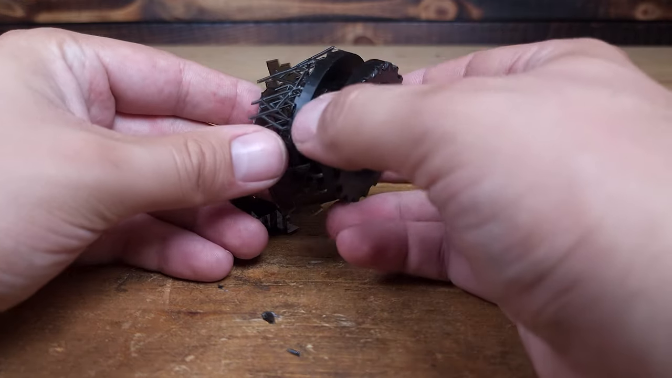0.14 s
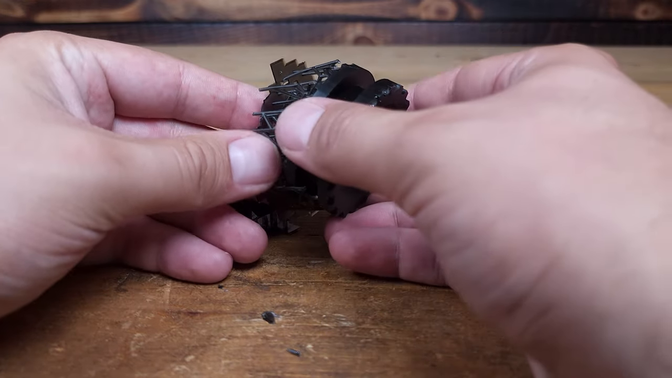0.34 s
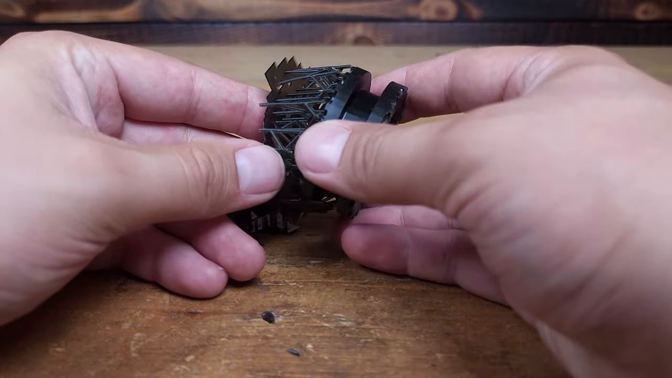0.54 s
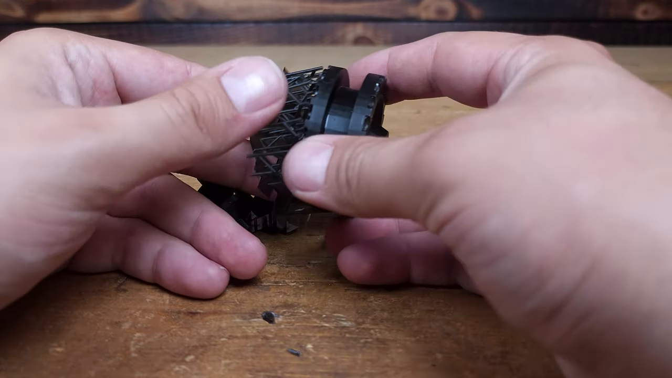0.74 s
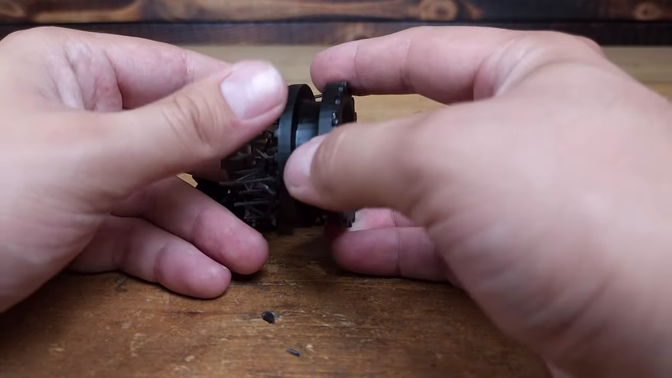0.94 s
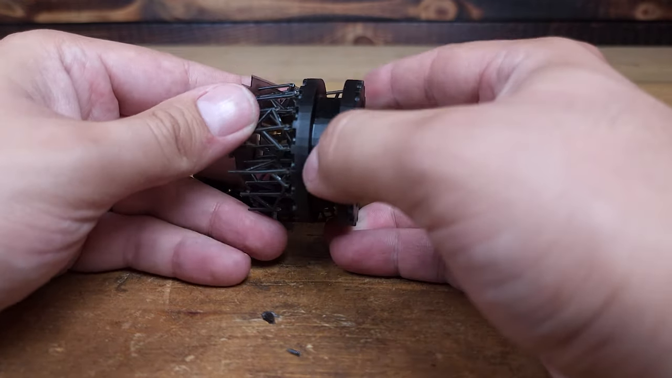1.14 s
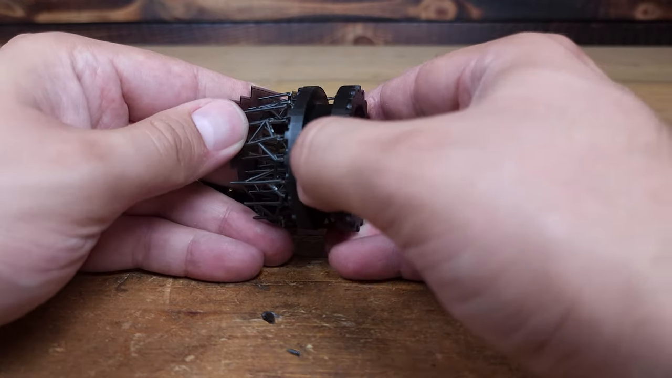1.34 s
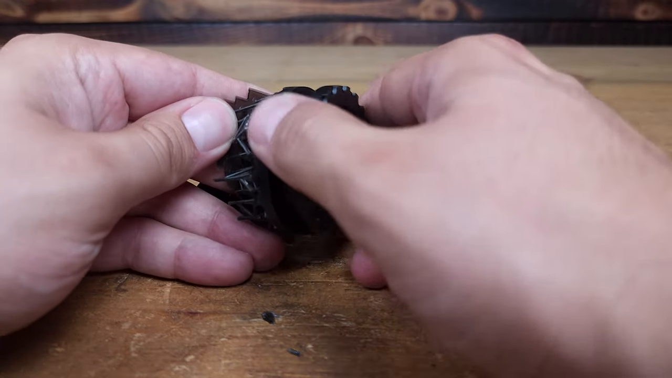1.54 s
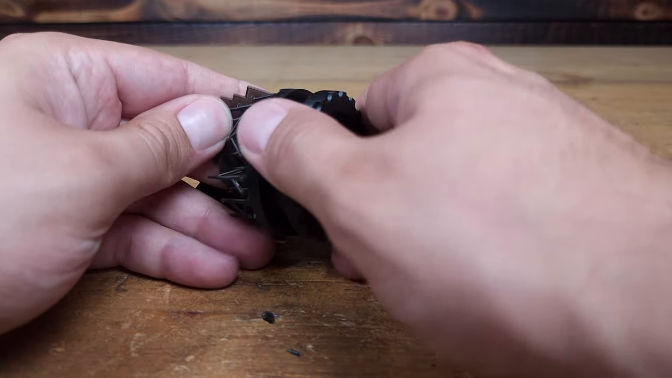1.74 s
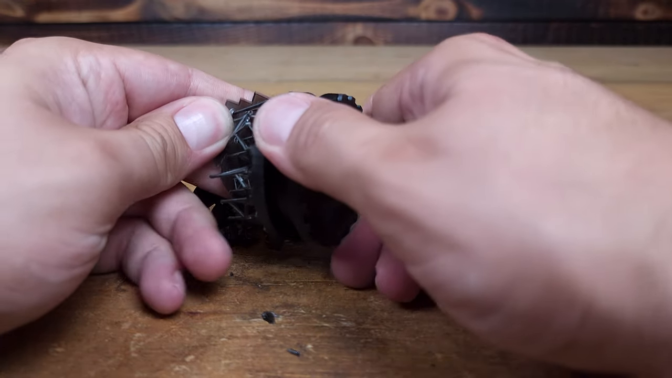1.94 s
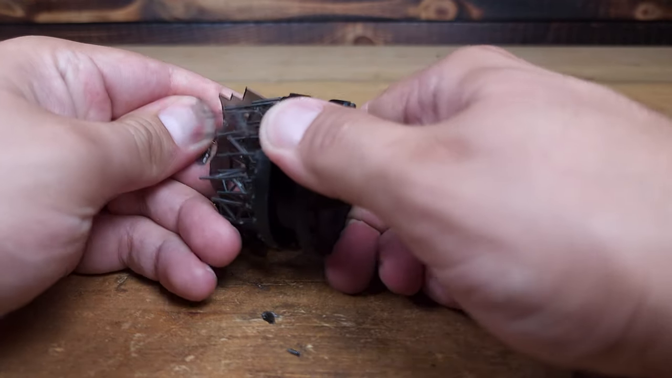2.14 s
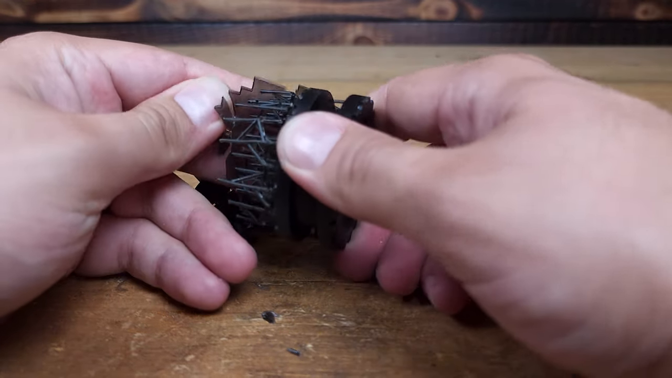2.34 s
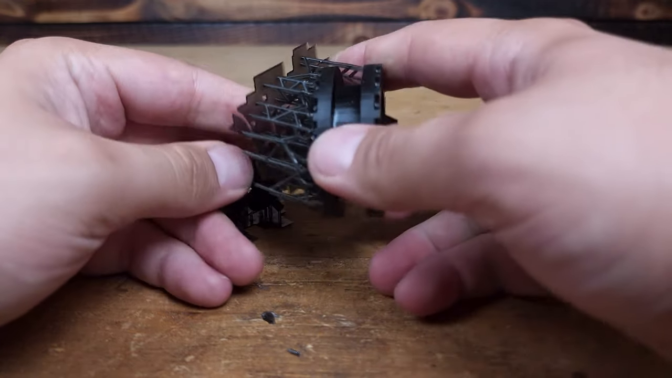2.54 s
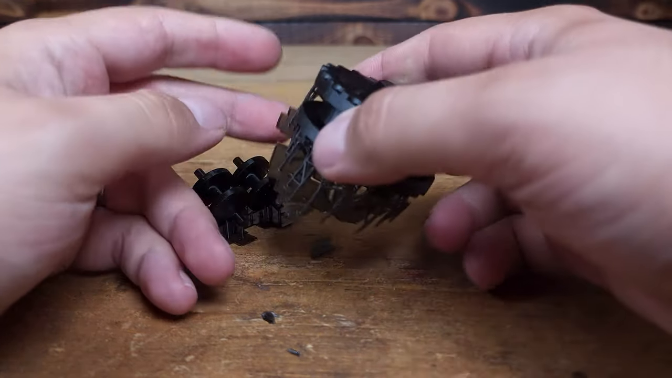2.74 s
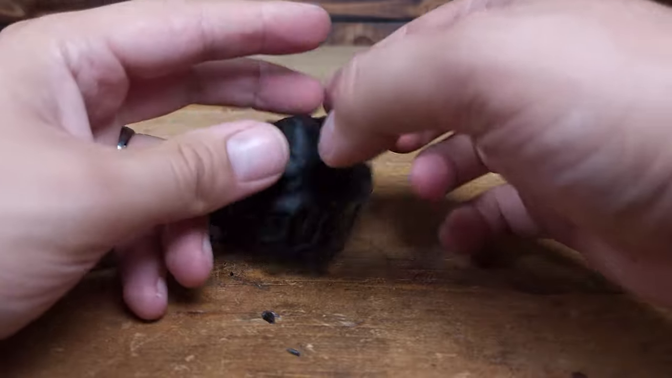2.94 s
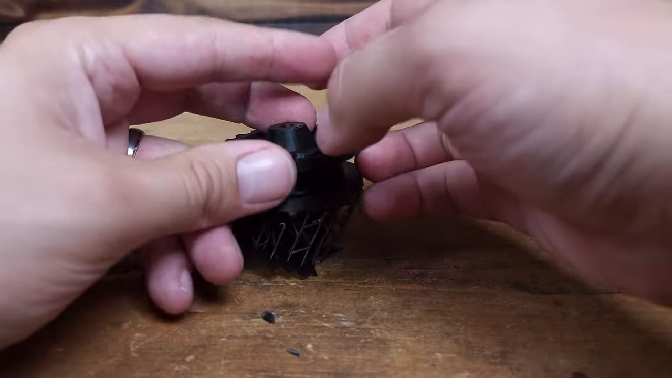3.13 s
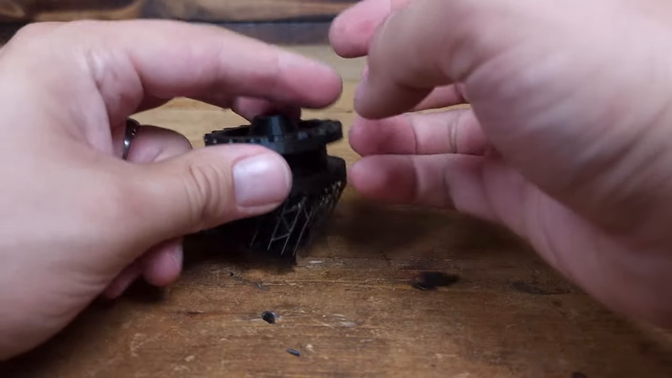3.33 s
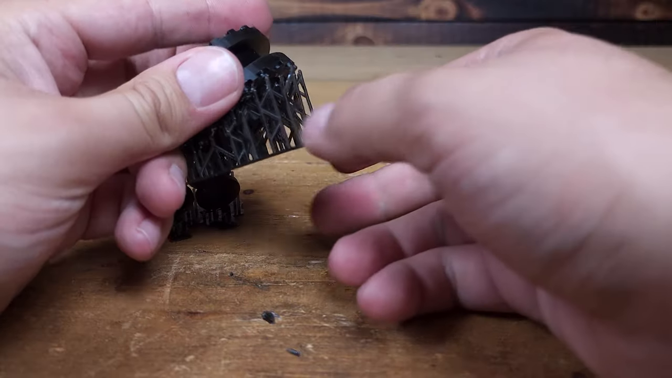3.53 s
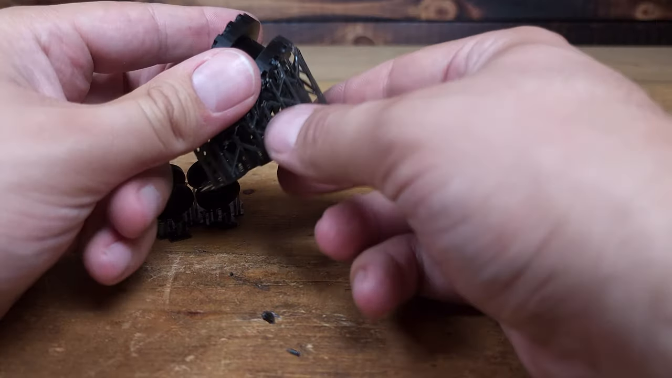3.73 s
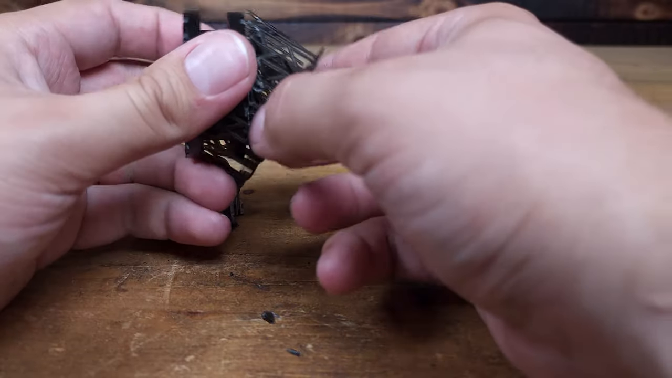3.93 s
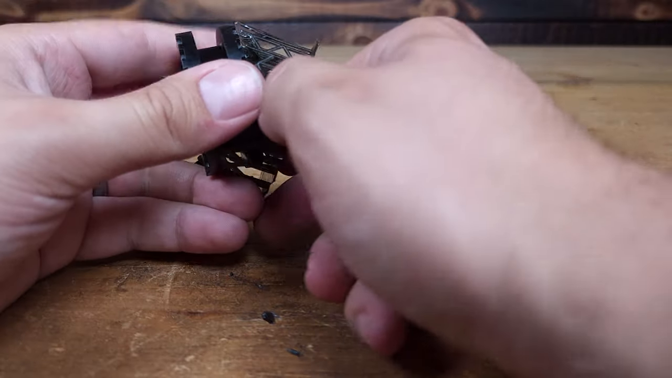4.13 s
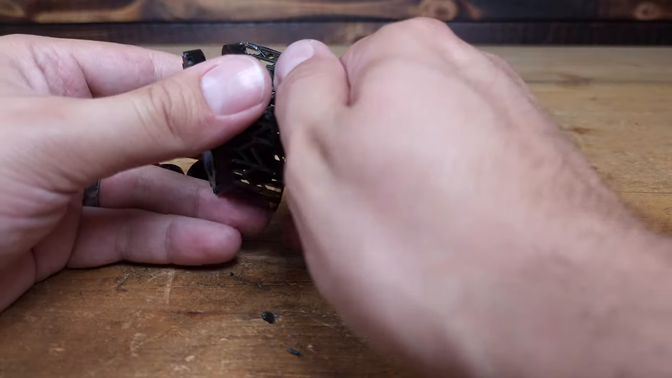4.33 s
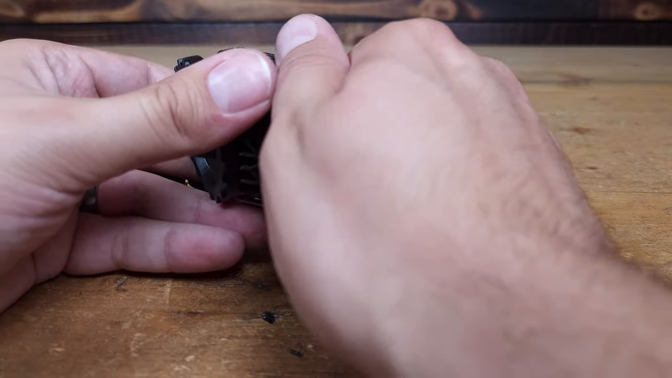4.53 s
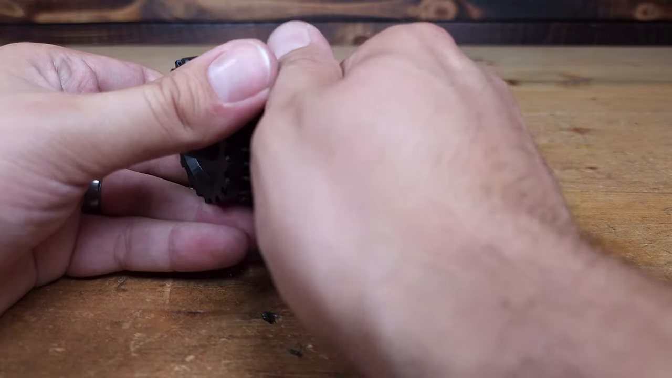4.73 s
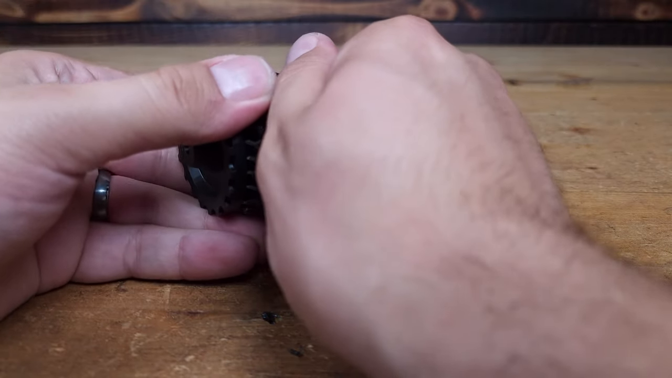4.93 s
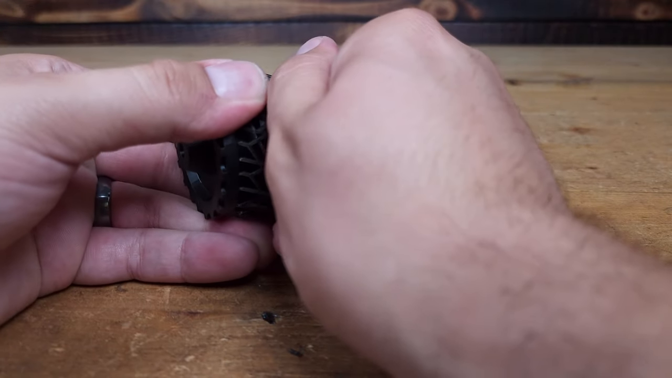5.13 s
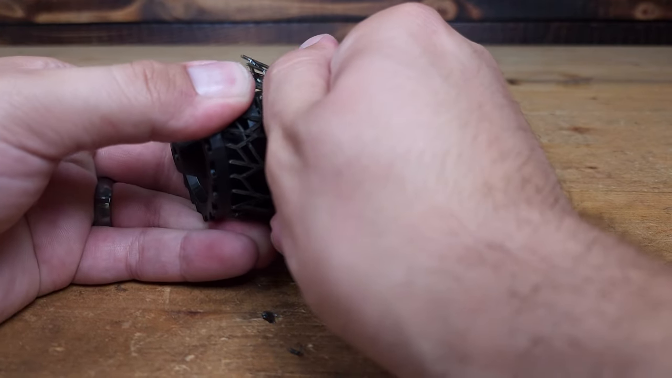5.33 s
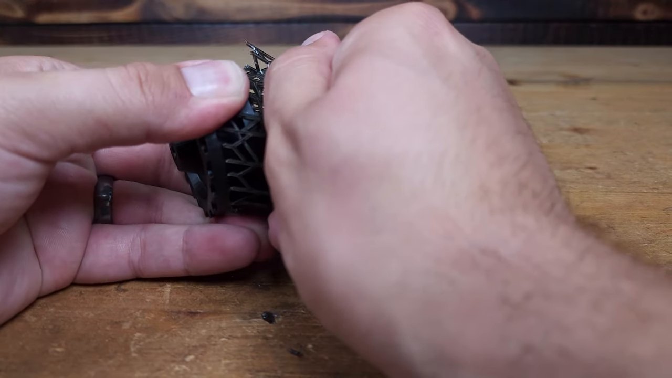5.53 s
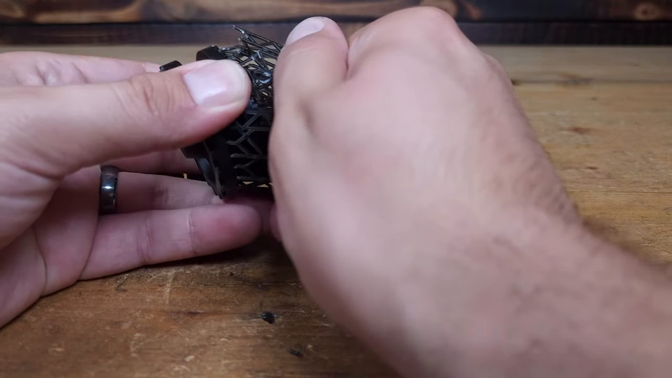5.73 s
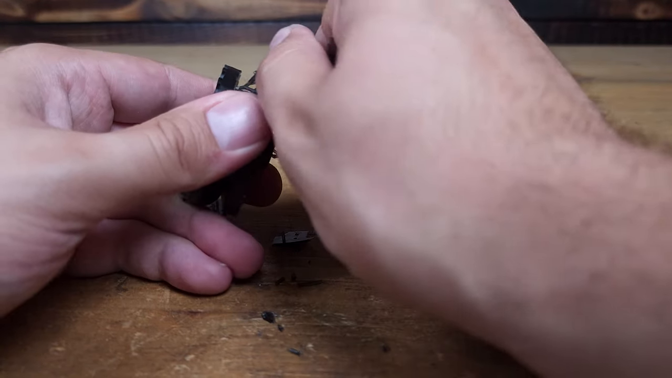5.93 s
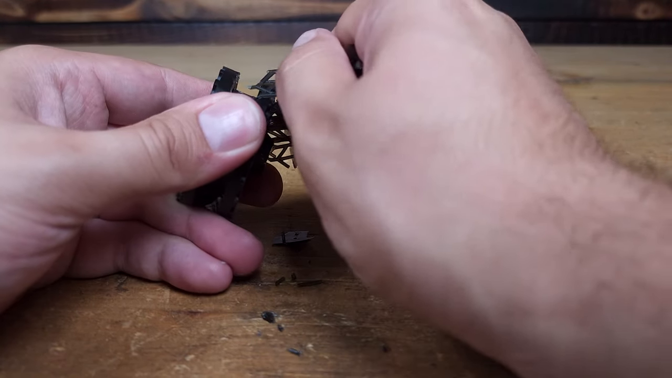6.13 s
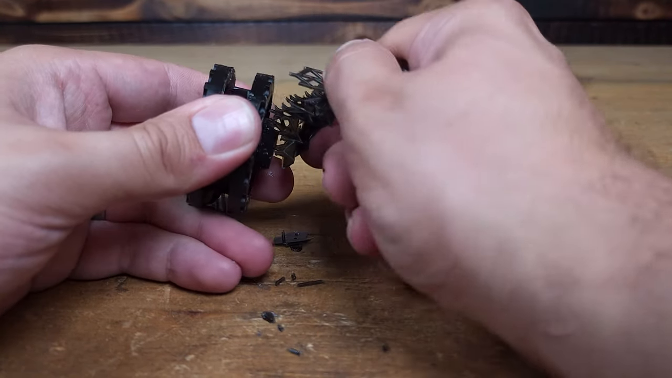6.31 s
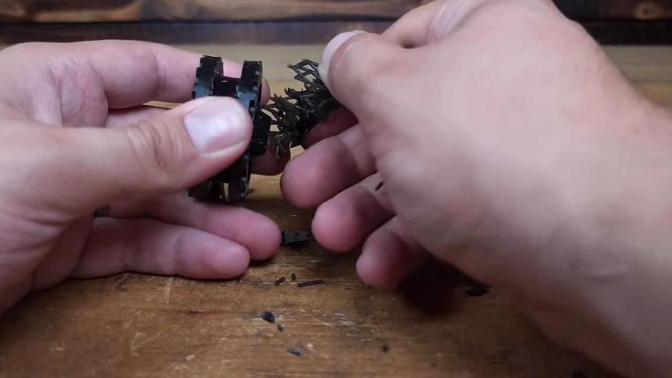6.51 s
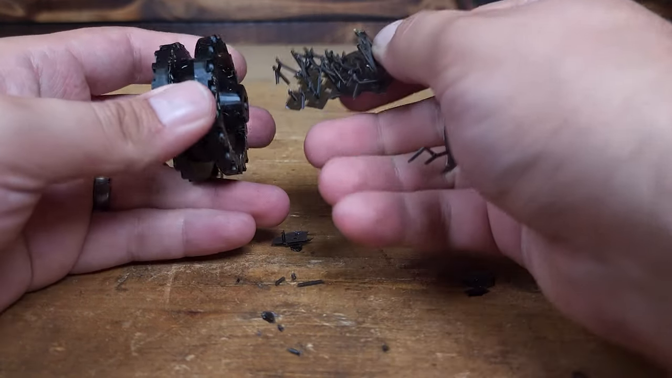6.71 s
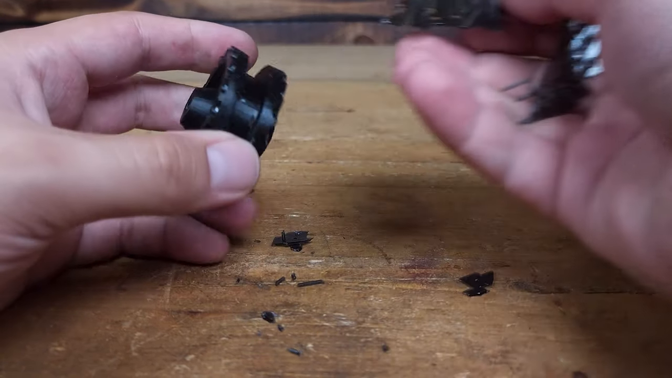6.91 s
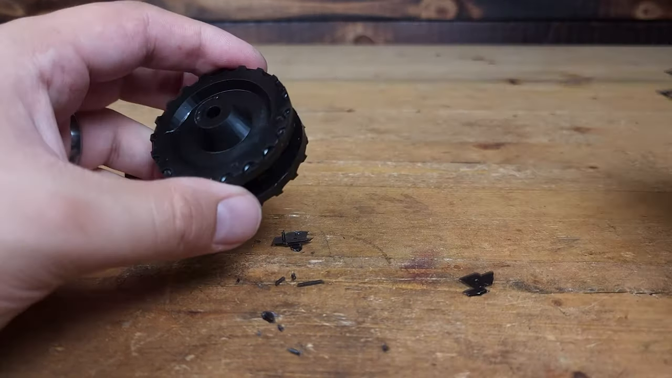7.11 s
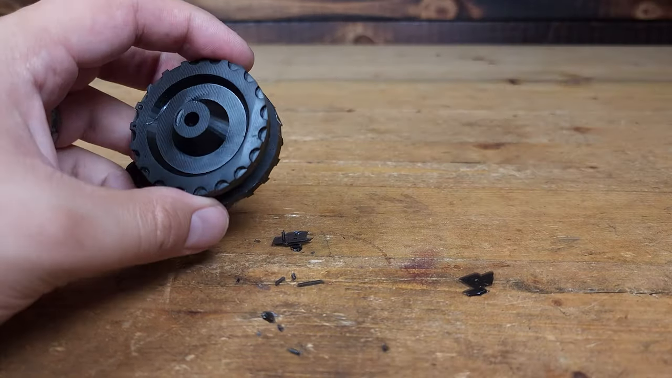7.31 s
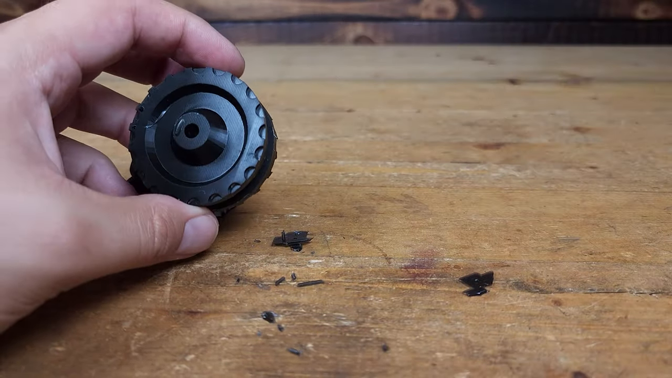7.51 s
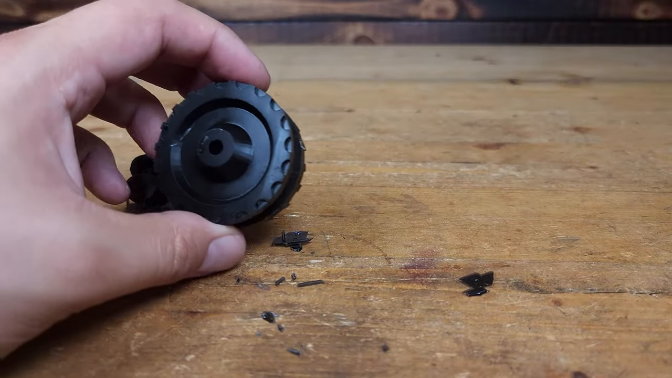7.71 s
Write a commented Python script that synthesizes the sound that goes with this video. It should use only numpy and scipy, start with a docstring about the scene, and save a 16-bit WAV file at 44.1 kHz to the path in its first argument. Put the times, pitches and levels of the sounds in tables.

```python
"""Faint hum and hiss and the soft rub of fingers come first; creaks and ticks lead to runs of sharp snaps.
Two hands break the support lattice off a small resin-printed wheel above a wooden table in a small room.
Struts crack as noise bursts with ringing modes; knocks and bumps are decaying modes of the table.
Rubs, the lattice's shiver and short resonant touches (hollow taps, ticks, squeaks) are shaped noise.
Close stereo pick-up holds it all."""
import sys
import numpy as np
from scipy import signal
from scipy.io import wavfile
from scipy.ndimage import uniform_filter1d

SR = 44100
rng = np.random.default_rng(int(sys.argv[2]) if len(sys.argv) > 2 else 0)


def wav_record(signal):
    """Record a signal, one row per channel, as 16-bit PCM in the file named by sys.argv[1]."""
    frames = np.transpose(np.atleast_2d(signal))
    bounded = np.clip(frames, -1, 1)
    # unit amplitude maps onto the largest positive 16-bit level
    quanta = np.round(bounded * 32767).astype(np.int16)
    wavfile.write(sys.argv[1], SR, quanta)


N = 346626
TIME = np.arange(N) / SR


# thick struts breaking: t/s, relative level/dB at 6-10 kHz, body below 2 kHz/dB against that level,
# treble tilt/dB per zone, stub pitch f/Hz
STRUT_SNAPS = [(2.112, -30.5, -16, -6.5, 1251), (2.1517, -13, -17, 3.5, 1610), (2.155, -22, -16, 4.5, 1670),
               (2.971, -24, -6, -7.5, 3900), (5.1444, -10.5, -13, 7, 1830), (5.249, -13, -7.5, .5, 1936),
               (5.353, -10, -7, -1, 1847), (5.4072, -19, -6, 0.5, 2126), (5.4879, -14.5, -2.5, -3, 1845),
               (5.4992, -7, -19, -0.5, 4480), (5.5363, -16.5, -8, -1, 1300), (5.989, -20.5, -19, -1, 1157),
               (6.0087, -25, -16, 2, 1131), (6.028, -8, -32.5, 4, 4540), (6.0635, -10, -18, 2, 2264),
               (6.075, -24.5, -21.5, 1.5, 2270), (6.0848, -11, -20, 3, 4183), (6.0929, -20, -21, 0.5, 1120),
               (6.108, -17, -21.5, 4, 2477), (6.285, -10.5, -9, -2, 1080), (6.2882, -11.5, -13, 1.5, 1400),
               (6.302, -24.5, -9, -5.5, 1283), (6.3117, -18.5, -9.5, -1, 1826)]
SNAP_MIDDLE_DB, SNAP_TOP_DB = -4, 0.5  # 2-6 kHz and 10-16 kHz against the level, before tilt
STUB_WIDTH_HZ, STUB_DB = 280, 6.5
# modes of the lattice under every snap: f/Hz, width/Hz, level/dB against the burst spectrum
LATTICE_MODES = [(4520, 190, 0), (6290, 250, 0.5), (7400, 230, 5), (11800, 250, -4)]
MODE_SCATTER = 0.01  # standard deviation of the mode pitches from snap to snap, as a share


def snaps():
    """Brittle fracture: each thick strut's burst excites its own stub pitch and the lattice modes."""
    out = np.zeros((2, N))
    shifts = 1 + MODE_SCATTER * rng.standard_normal((len(STRUT_SNAPS), len(LATTICE_MODES)))
    for (s, level_db, body_db, tilt_db, stub_hz), shift in zip(STRUT_SNAPS, shifts):
        zone_db = level_db + np.array([body_db, SNAP_MIDDLE_DB - tilt_db, 0, SNAP_TOP_DB + tilt_db])
        modes = [(stub_hz, STUB_WIDTH_HZ, STUB_DB)]
        for (hz, width_hz, mode_db), ratio in zip(LATTICE_MODES, shift):
            modes.append((hz * ratio, width_hz, mode_db))
        snap = crack(zone_db, modes, rise_s=.0004, fall_s=.0012, ring_db=-14, ring_s=.0038)
        add(out, s, from_db(-1.0) * snap)
    return out


# small cracks and contacts: t/s, relative level/dB at 6-10 kHz, tilt/dB per zone upwards
SMALL_TICKS = [(1.187, -58, -3), (1.2802, -44, -0.5), (1.778, -45, -1.5), (1.857, -45.5, -2),
               (1.881, -42.5, -2), (1.9, -46, -5), (2.994, -30, 2), (3.051, -39, 2.5), (3.2615, -35.5, 6),
               (3.314, -38.5, 7), (3.563, -56, 5.5), (3.73, -50, 4), (3.921, -39.5, 1.5), (4.779, -46, 2),
               (4.793, -46, 3.5), (4.889, -43.5, -9), (4.941, -52, -5.5), (5.595, -35.5, -2.5),
               (5.764, -44.5, 2), (6.2137, -34, 3.5), (6.433, -33, 1.5), (6.571, -35.5, 5.5),
               (6.691, -52.5, 8), (7.01, -48.5, 7), (7.523, -37, 9.5), (7.593, -52.5, -9),
               (7.742, -41.5, 4), (7.784, -51, -10)]
# colour shared by the ticks: level/dB in each of the four zones
TICK_ZONES_DB = [-15.5, 0, 0, -5]
# modes of the wheel with its lattice: f/Hz, width/Hz, level/dB against the burst spectrum
WHEEL_MODES = [(1110, 330, 4), (1785, 270, 6), (3040, 220, -5), (5168, 120, 5), (7230, 650, 3)]


def ticks():
    """Impulsive excitation: small cracks and contacts set the modes of the wheel ringing."""
    out = np.zeros((2, N))
    for s, level_db, tilt_db in SMALL_TICKS:
        zone_db = level_db + np.array(TICK_ZONES_DB) + tilt_db * (np.arange(4) - 2)
        tick = crack(zone_db, WHEEL_MODES, rise_s=.0004, fall_s=.001, ring_db=-11, ring_s=.005)
        add(out, s, from_db(-3.0) * tick)
    return out


# creaks of the lattice: t/s, length/s, slip rate f/Hz, relative level/dB
CREAK_RUNS = [(0.458, 0.051, 108, -63), (0.589, 0.041, 112, -64), (1.095, 0.074, 31, -70.5),
              (1.2925, 0.019, 97, -54), (1.314, 0.06, 118, -51), (1.391, 0.023, 80, -53),
              (1.504, 0.024, 73, -56.5), (1.586, 0.031, 57, -63), (1.798, 0.056, 60, -57.5),
              (4.912, 0.076, 42, -59.5)]
# colour shared by the slips: level/dB in each of the four zones
CREAK_ZONES_DB = [-12, 7, -3, -11]


def creaks():
    """Stick-slip: bent struts let go in even slips, each ringing the wheel."""
    out = np.zeros((2, N))
    modes = [(hz, width_hz, mode_db + 9) for hz, width_hz, mode_db in WHEEL_MODES]
    for s, length_s, slips_per_s, level_db in CREAK_RUNS:
        for since in np.arange(0, length_s, 1 / slips_per_s):
            # the slips weaken as the strain is let go
            slip_db = level_db - 4 * since / length_s
            zone_db = slip_db + np.array(CREAK_ZONES_DB) + rng.normal(0, 1.1)
            slip = crack(zone_db, modes, rise_s=.0002, fall_s=.0014, ring_db=-20, ring_s=.003)
            add(out, s + since, from_db(-4.0) * slip)
    return out


# bounds of the four spectral zones of a crack: f/Hz
CRACK_ZONES_HZ = [300, 2000, 6000, 10000, 16000]
# colour of the resin, common to the burst of every crack: f/Hz, level/dB
RESIN_COLOUR = [(350, -2.5), (650, -6.5), (1200, 1.5), (1900, -7), (3000, 0.5), (4500, 1), (7500, 0.5),
                (10500, 1), (15000, 0.5)]


def crack(zone_db, modes, rise_s, fall_s, ring_db, ring_s):
    """Impulsive fracture: a brief noise burst drives narrow modes; levels are energy over one millisecond."""
    t = np.arange(1024) / SR
    edges = np.array(CRACK_ZONES_HZ)
    centres = np.sqrt(edges[1:] * edges[:-1])
    per_hz = np.column_stack([centres, zone_db - 10 * np.log10(np.diff(edges))])
    fall = np.exp(-(t / fall_s) ** 2) + from_db(ring_db) * np.exp(-t / ring_s)
    shape = (1 - np.exp(-(t / rise_s) ** 2)) * fall
    out = np.zeros((2, len(t)))
    for hz, width, sos in BANDS[5:]:
        burst = stereo(signal.sosfilt(sos, shape * rng.standard_normal((2, len(t)))), hz)
        gain = from_db(at_hz(per_hz, hz) + at_hz(RESIN_COLOUR, hz))
        out += energy_one(burst) * np.sqrt(width) * gain
    for hz, width_hz, mode_db in modes:
        ring = stereo(resonate(shape * rng.standard_normal((2, len(t))), hz, width_hz), hz)
        gain = from_db(at_hz(per_hz, hz) + mode_db)
        out += energy_one(ring) * np.sqrt(np.pi * width_hz) * gain
    return out * np.sqrt(SR / 1000)


# shivers of the freed lattice: t/s at the peak, relative level/dB, swell time constant/s, T60/s
LATTICE_SHIVERS = [(2.153, -29, 0.011, 0.4)]
# their spectrum: f/Hz, relative level/dB per Hz
SHIVER_SPECTRUM = [(290, -54.5), (500, -17), (570, -18.5), (750, -28), (1400, -18.5), (2430, -23),
                   (4280, -10), (5020, -15), (6700, 2), (8830, -11.5), (11600, -15), (12700, -16.5),
                   (16000, -18.5)]


def lattice_shiver():
    """Exponential decay: the jostling thin struts merge into noise that swells and dies away."""
    level = np.zeros(N)
    for s, level_db, swell_s, t60 in LATTICE_SHIVERS:
        decay = from_db(level_db - 60 * np.maximum(TIME - s, 0) / t60)
        level += decay * np.exp(np.minimum(TIME - s, 0) / swell_s)
    return level * coloured(SHIVER_SPECTRUM, rng.standard_normal((2, 2, N)))


# parts set down on the table: t/s, relative level/dB, contact cut-off f/Hz
PART_KNOCKS = [(2.371, -52.5, 253), (2.971, -28, 312), (2.993, -41, 1620), (3.008, -31.5, 279),
               (3.222, -56, 1280), (3.262, -50.5, 2100), (3.372, -56.5, 1083), (5.68, -54, 502),
               (5.866, -38, 300), (5.88, -33, 485), (7.403, -64, 2005), (7.5234, -41.5, 2000),
               (7.592, -49.5, 1920), (7.671, -56.5, 1316), (7.739, -55.5, 1500), (7.766, -49, 2050)]
# modes of the table top: f/Hz, relative level/dB, T60/s
TABLE_MODES = [(165, -9, .08), (300, -3.5, .13), (410, -6, .08), (592, -6, .1), (775, -9, .09),
               (1003, -4, .07), (1320, -2, .09), (1730, -3, .05), (1930, -7, .06), (4183, -10, .06)]
BOUNCE_S, BOUNCE_LOSS_DB = .016, 7.5  # base gap, randomly scaled below; loss at each bounce


def knocks():
    """Inelastic impact: hard parts strike the boards, then bounce twice with less energy each time."""
    out = np.zeros((2, N))
    gaps = BOUNCE_S * rng.uniform(.6, 1.7, (len(PART_KNOCKS), 2))
    for (s, first_db, contact_hz), gap in zip(PART_KNOCKS, gaps):
        for bounce, touch_s in enumerate(np.cumsum([s, *gap])):
            level_db = first_db - BOUNCE_LOSS_DB * bounce
            add(out, touch_s, from_db(level_db + 1.0) * struck(TABLE_MODES, contact_hz, spread_db=1.0))
            add(out, touch_s, from_db(level_db - 8.5) * thud(contact_hz, t60=0.14))
    return out


def thud(contact_hz, t60):
    """Modal overlap: the boards' close, heavily damped modes merge into a short noisy thud."""
    t = np.arange(SR // 4) / SR
    band = signal.butter(2, [210, np.clip(contact_hz, 400, 8000)], "band", fs=SR, output="sos")
    body = rms_one(stereo(signal.sosfilt(band, rng.standard_normal((2, len(t)))), contact_hz / 2))
    return body * from_db(-60 * t / t60) * (1 - np.exp(-2 * t * contact_hz))


# hands and wheel bumping the table: t/s, relative level/dB, contact cut-off f/Hz
HAND_BUMPS = [(2.155, -40, 300), (2.175, -42.5, 401), (2.373, -44, 254), (2.407, -47, 244),
              (2.972, -51, 700), (3.011, -45, 600), (3.249, -47.5, 250), (5.26, -45.5, 200),
              (5.306, -35, 180), (5.351, -31, 224), (5.372, -39.5, 150), (5.5, -32, 213), (5.866, -33, 278),
              (6.062, -40, 250), (6.285, -36, 450), (7.774, -43, 89)]
# swaying modes of the whole table: f/Hz, relative level/dB, T60/s
SWAY_MODES = [(38, -6, .2), (55, -2, .18), (78, -5, .12), (108, -6, .08), (150, -4, .09), (210, -7, .08),
              (265, -8, .08), (320, -5, .09), (400, -6, .08)]


def bumps():
    """Soft impact: recoiling hands excite the low modes of the whole table."""
    out = np.zeros((2, N))
    for s, level_db, contact_hz in HAND_BUMPS:
        add(out, s, from_db(level_db + 1.5) * struck(SWAY_MODES, contact_hz, spread_db=2.5))
    return out


def struck(modes, contact_hz, spread_db):
    """Modal superposition: one blow sums decaying sines; a soft contact barely excites the high ones."""
    t = np.arange(SR // 2) / SR
    sides = np.array([[1], [-1]])
    out = np.zeros((2, len(t)))
    for hz, level_db, t60 in modes:
        strength = from_db(level_db + spread_db * rng.standard_normal())
        gain = strength / np.hypot(1, (hz / contact_hz) ** 2)
        # the phase between the channels sets their likeness
        alike = np.clip(at_hz(CHANNEL_LIKENESS, hz), -1, 1)
        apart = np.arccos(alike) / 2 * rng.choice([-1, 1]) * sides
        ring = np.sin(2 * np.pi * hz * t + apart) * from_db(-60 * t / t60)
        out += gain * rng.choice([-1, 1]) * ring
    return out * (1 - np.exp(-(2 * t * contact_hz) ** 2))


# short resonant sounds of the handling (hollow taps, ticks and squeaks):
# t/s, length/s, resonance f/Hz, relative level/dB
RESONANT_TOUCHES = [(0.323, 0.018, 1140, -54.5), (0.325, 0.011, 4500, -52.5), (0.832, 0.088, 7800, -60),
                    (1.005, 0.073, 4900, -64.5), (1.077, 0.17, 4800, -73), (1.523, 0.053, 8040, -63),
                    (1.615, 0.018, 1026, -50.5), (1.919, 0.0072, 983, -50.5), (1.921, 0.29, 2350, -70.5),
                    (2.886, 0.078, 9400, -55), (2.988, .018, 1220, -35.5), (3.095, 0.074, 977, -60),
                    (3.202, 0.052, 1170, -54.5), (3.337, 0.053, 990, -62), (4.238, 0.053, 5840, -60.5),
                    (4.953, 0.016, 1010, -53), (4.982, 0.0095, 930, -48), (7.38, 0.057, 1390, -63.5)]
# width = this share of the pitch + blur / length: short touches are less tonal
TOUCH_WIDTH_SHARE, TOUCH_BLUR = 0.2, 3


def resonant_touches():
    """Resonance: hollow taps, ticks and squeaks, each a swell of noise narrowed by two equal resonances."""
    out = np.zeros((2, N))
    for s, length_s, hz, level_db in RESONANT_TOUCHES:
        width_hz = TOUCH_WIDTH_SHARE * hz + TOUCH_BLUR / length_s
        noise = rng.standard_normal((2, SR // 3))
        tone = resonate(resonate(noise, hz, width_hz), hz, width_hz)
        # keep only the end, where the resonance has settled
        voice = rms_one(stereo(tone, hz)[:, -round(length_s * SR):])
        add(out, s, from_db(level_db - 2.0) * voice * np.hanning(voice.shape[1]))
    return out


# fingers sliding over the part: t/s, length/s, relative skin rub level/dB,
# relative nail and resin scratch level/dB
FINGER_STROKES = [(0.036, 0.22, -74, -70.5), (0.29, 0.16, -73.5, -74), (0.416, 0.13, -69.5, -69.5),
                  (0.573, 0.071, -79, -66.5), (0.833, 0.13, -85, -80), (0.973, 0.26, -81, -74),
                  (1.342, 0.19, -61.5, -65.5), (1.49, 0.24, -65, -65.5), (1.735, 0.34, -63, -71.5),
                  (2.456, 0.072, -78, -67.5), (2.625, 0.18, -67.5, -69), (2.873, 0.21, -85, -63.5),
                  (3.186, 0.21, -64, -65.5), (3.478, 0.039, -95.5, -70), (3.63, .24, -83, -71),
                  (4.12, 0.39, -75, -74), (4.544, 0.25, -76.5, -76.5), (4.755, 0.61, -64.5, -67),
                  (5.64, 0.27, -74.5, -61.5), (5.851, 0.17, -53, -63), (7.044, 0.044, -74.5, -72),
                  (7.366, .11, -72, -67), (7.533, 0.33, -64, -76.5), (7.739, .11, -55.5, -74)]
# spectrum of the skin rub: f/Hz, relative level/dB per Hz
RUB_SPECTRUM = [(300, 2.5), (700, -5), (1200, -2), (2000, -3.5), (3200, -18), (6000, -36)]
# spectrum of the nail and resin scratch: f/Hz, relative level/dB per Hz
SCRATCH_SPECTRUM = [(1500, -28), (3000, -9), (5000, 1), (7500, 3), (10000, -8.5), (15000, -8.5)]


def fingers(grains_per_s, grain_db, smooth_share):
    """Sliding friction: steady noise and random grains make a soft skin rub and a bright nail scratch."""
    rub, scratch = np.zeros(N), np.zeros(N)
    for s, length_s, rub_db, scratch_db in FINGER_STROKES:
        add(rub, s, from_db(rub_db) * swell(length_s))
        add(scratch, s, from_db(scratch_db) * swell(length_s))
    grain_gain = from_db(grain_db * np.minimum(rng.exponential(1, N), 4))
    grains = (rng.random(N) < grains_per_s / SR) * grain_gain
    friction = rng.standard_normal((2, 2, N)) * (rms_one(grains) + smooth_share)
    skin = from_db(-3.0) * rub * coloured(RUB_SPECTRUM, friction)
    nails = from_db(0.5) * scratch * coloured(SCRATCH_SPECTRUM, friction)
    return skin + nails


SWELL_SHARE, STROKE_CURVE = 0.27, 1.3  # peak position as a share of the length; how pointed the swell is


def swell(length_s):
    """Amplitude envelope: the pressure of one stroke builds, peaks early and eases off."""
    through = np.linspace(0, 1, round(length_s * SR))
    ramp = np.interp(through, [0, np.clip(SWELL_SHARE, .05, .95), 1], [0, 1, 0])
    return np.sin(np.pi / 2 * ramp) ** STROKE_CURVE


# reverberation time of the room: f/Hz, T60/s
WALL_T60 = [(200, .25), (1000, .33), (4000, .35), (8000, .36), (15000, .31)]
# strength of the diffuse tail against the direct sound: f/Hz, level/dB
WALL_ECHO = [(200, -6.5), (1000, -19.5), (4000, -8), (8000, -13), (15000, -11)]


def room(x, near_db, near_delay_s, near_fall_s, build_s):
    """Reflection: hands and table return the first echoes, then the walls a short diffuse tail."""
    t = np.arange(int(.6 * SR)) / SR
    near = np.exp(-np.abs(t - near_delay_s) / near_fall_s) * (t > .0015)
    response = np.zeros((2, len(t)))
    for hz, width, sos in BANDS[2:]:
        tail = (1 - np.exp(-(t / build_s) ** 2)) * from_db(-60 * t / at_hz(WALL_T60, hz))
        for shape, level_db in ((near, near_db), (tail, at_hz(WALL_ECHO, hz))):
            echoes = stereo(signal.sosfilt(sos, shape * rng.standard_normal((2, len(t)))), hz)
            response += from_db(level_db) * energy_one(echoes) * 2 * np.sqrt(width / SR)
    return signal.fftconvolve(x, response, axes=1)[:, :N]


# spectrum of the hiss and rumble: f/Hz, relative level/dB per Hz
FLOOR_SPECTRUM = [(12, -36), (20, -5), (43, -5), (65, -1.5), (81, -2.5), (198, -19), (328, -17.5),
                  (513, -35.5), (759, -33.5), (897, -30), (1610, -32.5), (3840, -40), (7310, -35),
                  (12800, -57.5), (16000, -62)]
FLOOR_DB = -67
HUM_HZ, HUM_DB = 59.5, -63.5


def background():
    """Stationary noise and a modulated tone: faint hiss and rumble under a slightly wavering hum."""
    phase = 2 * np.pi * HUM_HZ * TIME + .95 * drift(15)
    hum = np.sin(phase) * from_db(2.2 * drift(5.1))
    hiss = coloured(FLOOR_SPECTRUM, rng.standard_normal((2, 2, N)))
    return from_db(FLOOR_DB) * hiss + from_db(HUM_DB) * rms_one(hum)


def drift(rate):
    """Random modulation: a slow wander of rms 1 through the given number of knots per second."""
    knots = rng.standard_normal(int(N / SR * rate) + 2)
    return rms_one(np.interp(TIME * rate, np.arange(len(knots)), knots))


# edges of the filter bank: f/Hz
FILTER_EDGES_HZ = [20, 45, 80, 140, 220, 320, 500, 750, 1100, 1600, 2300, 3200, 4300, 5600, 7000, 8500,
                   10300, 12300, 14300, 16500]
# filter bank: centre f/Hz, width/Hz, filter sections
BANDS = [(np.sqrt(lo * hi), hi - lo, signal.butter(2, [lo, hi], "band", fs=SR, output="sos"))
         for lo, hi in zip(FILTER_EDGES_HZ, FILTER_EDGES_HZ[1:])]


def coloured(spectrum, draws):
    """Spectral shaping: weighted bands make stereo sound of rms 1; neighbouring bands use other draws."""
    lowest_hz, highest_hz = spectrum[0][0] * .8, spectrum[-1][0] * 1.2
    heard = [band for band in BANDS if lowest_hz < band[0] < highest_hz]
    out = 0
    for k, (hz, width, sos) in enumerate(heard):
        out = out + from_db(at_hz(spectrum, hz)) * stereo(signal.sosfilt(sos, draws[k % 2]), hz)
    return rms_one(out)


# likeness of left and right: f/Hz, correlation (0-1)
CHANNEL_LIKENESS = [(50, .95), (130, .85), (300, .88), (600, .78), (1200, .2), (2500, .1), (8000, .3)]


def stereo(pair, hz):
    """Interchannel coherence: mid and side from unrelated signals, alike in the bass, apart in the treble."""
    alike = np.clip(at_hz(CHANNEL_LIKENESS, hz), -1, 1)
    side = np.sqrt(1 - alike) * pair[1] * np.array([[1], [-1]])
    return np.sqrt(1 + alike) * pair[0] + side


def resonate(x, hz, width_hz):
    """Simple resonance: a two-pole filter with gain 1 near its peak."""
    r = np.exp(-np.pi * width_hz / SR)
    zeros = np.array([1, 0, -1]) * (1 - r * r) / 2
    poles = [1, -2 * r * np.cos(2 * np.pi * hz / SR), r * r]
    return signal.lfilter(zeros, poles, x)


def from_db(db):
    """Logarithmic level: decibels to amplitude gain."""
    return 10 ** (np.asarray(db) / 20)


def rms_one(x):
    """Power normalisation: scale to rms 1."""
    return x / np.sqrt(np.mean(x ** 2) + 1e-30)


def energy_one(x):
    """Energy normalisation: scale to a total energy of 1."""
    return x / np.sqrt(np.sum(x ** 2) + 1e-30)


def at_hz(points, hz):
    """Logarithmic pitch: interpolate a table of (f/Hz, value) along log frequency."""
    freq, value = np.transpose(points)
    return np.interp(np.log(hz), np.log(freq), value)


def add(out, s, sound):
    """Superposition: mix a sound in from time s."""
    start = round(s * SR)
    out[..., start:start + sound.shape[-1]] += sound[..., :N - start]


# brief dip in the handling sounds: start t/s, end t/s
DIP_S = (5.914, 5.975)
LEFT_LEAD_SAMPLES, LEFT_LOUDER_DB = 4, 0.9


def scene():
    """Superposition: handling sounds, partly with room echo, dip before the last run of snaps."""
    work = snaps() + ticks() + creaks() + knocks() + resonant_touches()
    work = work + fingers(grains_per_s=310, grain_db=3.0, smooth_share=0.32)
    echoes = room(work, near_db=-7.5, near_delay_s=0.0028, near_fall_s=0.0096, build_s=0.0032)
    heard = work + echoes + lattice_shiver() + bumps()
    # the sound reaches the right capsule a little later and weaker
    balance = from_db([[LEFT_LOUDER_DB / 2], [-LEFT_LOUDER_DB / 2]])
    heard = np.array([heard[0], np.roll(heard[1], LEFT_LEAD_SAMPLES)]) * balance
    dip = (TIME > DIP_S[0]) & (TIME < DIP_S[1])
    handling_gain = 1 - 0.91 * uniform_filter1d(dip * 1., size=64)  # short smooth edges
    return heard * handling_gain + background()


CUTOFF_HZ = 16100


def record(dry):
    """Saturation and low-pass filtering: the tallest peaks are rounded and the top is cut."""
    low_pass = signal.ellip(10, .1, 80, CUTOFF_HZ, fs=SR, output="sos")
    rounded = .85 * np.tanh(dry / .85)
    return signal.sosfilt(low_pass, rounded)


dry = scene()
out = record(dry)
wav_record(out)
```